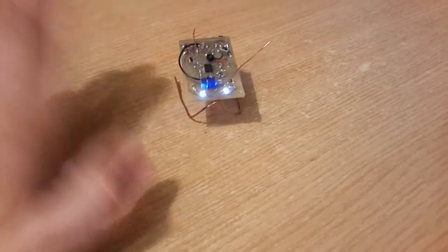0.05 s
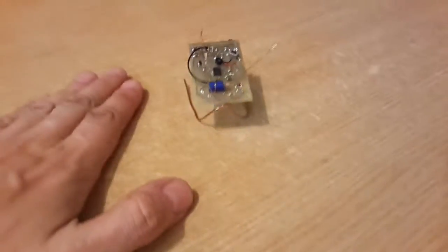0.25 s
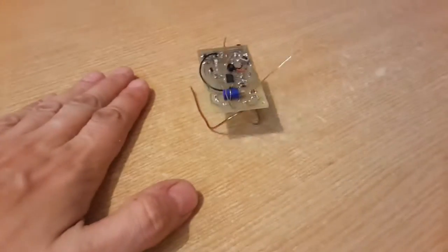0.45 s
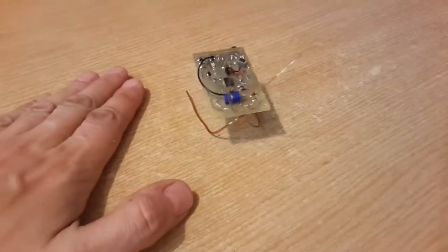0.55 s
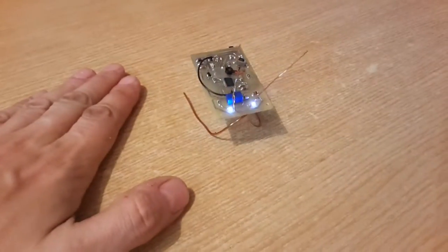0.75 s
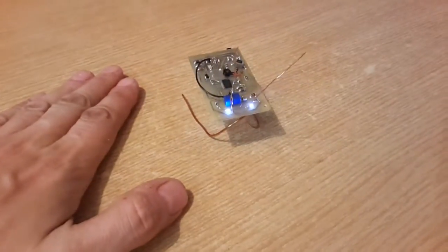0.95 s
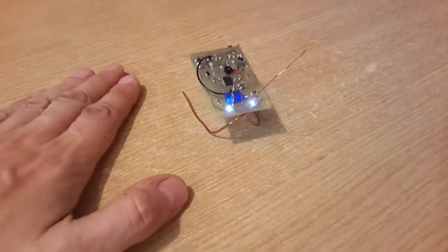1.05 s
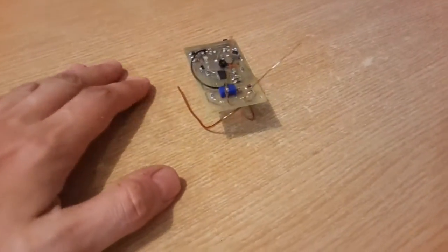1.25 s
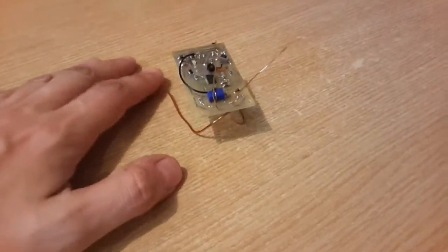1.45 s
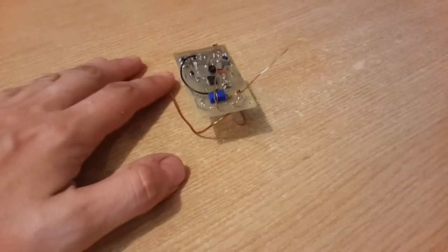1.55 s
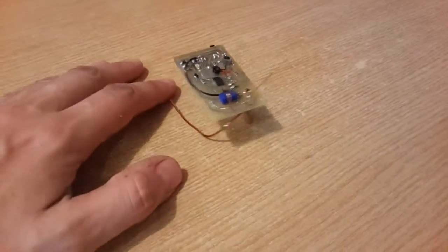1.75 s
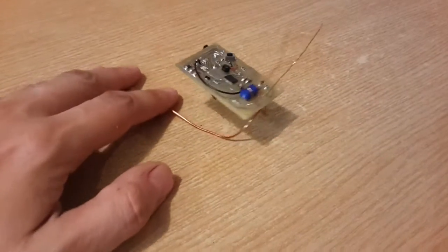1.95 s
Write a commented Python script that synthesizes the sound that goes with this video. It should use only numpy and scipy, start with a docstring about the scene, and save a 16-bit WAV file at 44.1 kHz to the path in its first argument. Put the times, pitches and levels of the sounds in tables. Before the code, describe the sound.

One sharp palm slap booms through a wooden tabletop, close to the microphone in a quiet room. A small motor follows with a brief, softer buzz and rattle of wire feet, fading into very faint tinkles and finger rubs.

```python
"""A quiet room, a stereo microphone pair close to a wooden table.
A flat hand slaps the top, which booms and rings, and wakes a tiny robot standing on wire legs.
Its vibration motor buzzes for half a second: two feet tap in each turn and clatter in fits as it hops.
The buzz fades, the robot lands, its wires tinkle faintly and fingers slide on the wood."""
import sys
import numpy as np
from scipy import signal
from scipy.fft import rfft, irfft
from scipy.io import wavfile
from scipy.ndimage import uniform_filter1d

SR = 44100
rng = np.random.default_rng(int(sys.argv[2]) if len(sys.argv) > 2 else 0)


def dump(signal):
    """Clip the signal to [-1, 1] and save it as 16-bit WAV at the path in sys.argv[1]."""
    limited = np.clip(np.atleast_2d(signal).T, -1, 1)
    pcm = np.round(limited * 32767).astype(np.int16)
    wavfile.write(sys.argv[1], SR, pcm)


N = 88200
T = np.arange(N) / SR
SLAP_S = 0.2432


# crack of skin on wood, close up (frequency [Hz], level [dB])
SKIN_CRACK = [(300, -14), (1000, 2), (1700, 4.5), (2200, 5.5), (3100, 0.5), (3600, -2.5), (4400, 7.5),
              (5400, -9), (7200, 5.5), (9000, -17.5), (16000, -13.5)]
# the slap across the microphones (frequency [Hz], left minus right [dB])
SLAP_BALANCE = [(700, 0.5), (2400, -8), (4400, 5.5), (8000, 21.5), (15000, 19.5)]
def slap(push_s=0.001194, rebound_s=0.00083, crack_s=0.0023, right_mic_lag_s=0.0002):
    """The palm pushes the board down, the skin cracks and the board springs back."""
    push = amp(-16) * arch(SLAP_S, push_s)
    rebound = amp(-9) * arch(SLAP_S + push_s, rebound_s)
    burst = rng.standard_normal(N) * np.sqrt(abs(arch(SLAP_S, crack_s)))
    direct = rebound - push + amp(-20.5) * colour(burst, SKIN_CRACK)
    mics = np.vstack([direct, delay(direct, right_mic_lag_s)])
    return room(pan(mics, SLAP_BALANCE), wet_db=-9.5)


# modes of the top (frequency [Hz], level [dB], t60 [s])
TABLE_MODES = [(71.27, -17.5, 0.7), (107.6, -5.5, 0.31), (127.1, 1.5, 0.59), (164.5, -0.5, 0.44),
               (195.2, -3.5, .45), (226.9, -2, 0.519), (261.8, -5, .4), (302.8, 1, 0.47), (344, -6.5, 0.35),
               (380, -5.5, 0.16), (423.7, -6, 0.3), (499.2, -11, 0.23), (596, 0.5, 0.34), (691, -10.5, 0.2),
               (1041, -16.5, .3)]
# dense boom of the table and the room around it (frequency [Hz], level [dB])
BOOM_SPECTRUM = [(30, -30.5), (80, -12.5), (140, -2.5), (300, -0.5), (620, 2), (780, -14), (1200, -12.5),
                 (1550, -24), (2200, -13.5), (4000, -24.5), (8000, -28), (16000, -46.5)]
# its decay (frequency [Hz], t60 [s])
BOOM_DECAY = [(80, .55), (500, 0.46), (1500, 0.28), (8000, 0.6)]
# the boom across the microphones (frequency [Hz], left minus right [dB])
BOOM_BALANCE = [(100, -3.5), (700, -1), (1300, -5.5), (2400, -7.5), (4400, 3.5), (8000, 9)]
# the slap, then the robot's landing (time [s], boom gain [dB], mode gain [dB])
TABLE_BLOWS = [(0.2442, 0.5, 0.5), (0.8143, -37, -58)]
def table(rise_s=0.021):
    """The struck top rings in low modes over a dense boom; the light robot makes only a dull thud."""
    modes = sum((-1) ** k * amp(db) * ring(hz, t60) for k, (hz, db, t60) in enumerate(TABLE_MODES))
    modes = amp(-25) * modes * (1 - np.exp(-T / rise_s))
    boom = amp(-29.5) * pan(colour(tail(BOOM_DECAY, hold_s=0.063), BOOM_SPECTRUM), BOOM_BALANCE)
    return sum(delay(amp(boom_db) * boom + amp(mode_db) * modes, s)
               for s, boom_db, mode_db in TABLE_BLOWS)


# spin of the weight (time [s], speed [turns/s])
MOTOR_SPEED = [(.3, 249), (.46, 236), (.556, 230.5), (.752, 227.6), (.82, 226), (1.0, 270)]
# strength of the buzz (time [s], hum level [dB], tapping level [dB])
MOTOR_LEVELS = [(.27, -70, -42.5), (.3, -70, -54.5), (.37, -62.5, -44), (.5, -50.5, -43), (.525, -52, -42),
                (.57, -48.5, -40.5), (.595, -52, -44.5), (.645, -51.5, -48), (.675, -52, -42.5),
                (.74, -54, -47), (.785, -49.5, -43), (.815, -60.5, -47.5), (.86, -74, -58),
                (.92, -100, -64.5), (1.02, -115, -85)]
# the robot across the microphones (frequency [Hz], left minus right [dB])
ROBOT_BALANCE = [(700, -3), (1500, -4.5), (3000, -4), (4000, 3), (5500, 5), (8000, 10.5), (10000, 4.5),
                 (14000, 14)]
def motor(waver=0.005):
    """From the slap on, an off-centre weight spins, shaking the table and rocking the feet."""
    turns = np.cumsum(curve(MOTOR_SPEED) * (1 + waver * drift(samples=1000))) / SR
    hum_db, tap_db = curve(MOTOR_LEVELS), curve(MOTOR_LEVELS, column=2)
    taps = room(foot_taps(turns) * amp(tap_db), wet_db=-9.5)
    drone = room(hum(turns, tap_db) * amp(hum_db), wet_db=-16)
    return (drone + pan(taps, ROBOT_BALANCE)) * (T > SLAP_S)


# ring of the legs and board (frequency [Hz], level [dB])
LEG_SPECTRUM = [(550, -26), (800, -12.5), (1150, -8), (1550, -20.5), (2300, -4.5), (3000, -2), (4000, -3.5),
                (4700, -13), (6000, -9.5), (7400, -3), (9500, -14.5), (15500, -18.5)]
# the legs' main ring shifts as they flex (time [s], frequency [Hz])
LEG_FLEX = [(.38, 3530), (.48, 3920), (.58, 3720), (.7, 3500), (.78, 3750)]
def foot_taps(turns, jitter_s=0.00011, spread_db=0.5, second_foot_db=-9, leg_t60=0.018, grit_s=0.002):
    """Two feet tap in each turn, ringing the board and the flexing legs."""
    times = T[1:][np.diff(np.floor(2 * turns)) > 0]
    foot = np.arange(len(times)) % 2
    force_scatter, time_scatter = rng.standard_normal((N, 2))[:len(times)].T
    times = times + jitter_s * time_scatter
    sizes = amp(spread_db * force_scatter + second_foot_db * foot)
    clicks = np.zeros((2, 1, N))  # foot, microphone, sample
    clicks[foot, 0, np.clip(times * SR, 0, N - 1).astype(int)] = sizes
    foot_rings = rng.standard_normal((2, 2, N)) * decay(T, leg_t60)
    ringing = unit(signal.fftconvolve(clicks, foot_rings, axes=2).sum(0)[:, :N])
    grit = amp(-1) * unit(contacts(times, sizes, grit_s))
    board = unit(colour(ringing + grit, LEG_SPECTRUM))
    legs = resonate(contacts(times, sizes, grit_s), curve(LEG_FLEX), width_hz=720)
    return unit(board + amp(-0.5) * legs)


# hum through the top (multiple of the spin [1], level [dB], gain with tapping [dB/dB])
HUM_ORDERS = [(1, -2.5, 0), (2, -4.5, 0), (3, -13, 1.9), (4, -4.5, .6), (5, -9, .8), (10, -14, .8)]
def hum(turns, tap_db, neutral_tap_db=-44.5, flutter_db=3, wander_cycles=0.09):
    """The weight's hum: steady low orders, and overtones that swell and waver as the feet bite."""
    bite_db = np.clip(tap_db - neutral_tap_db, -10, 10)
    tone = np.zeros((1, N))
    for order, db, bite_gain in HUM_ORDERS:
        phase = order * turns + rng.random() + wander_cycles * (order > 2) * drift(samples=600)
        swell_db = bite_gain * (bite_db + flutter_db * drift(samples=700))
        tone += amp(db + swell_db) * np.sin(2 * np.pi * phase)
    return tone


# fits of clatter (time [s], gap between knocks [s], knocks [count], level [dB])
HOP_FITS = [(.3160, 0.001, 2, -5), (0.3462, 0.0024, 3, 0), (0.3801, .0028, 2, 2.5),
            (0.4054, 0.0029, 3, -1.5), (0.4342, 0.0037, 2, -0.5), (0.4632, 0.0036, 3, -3.5),
            (.4880, 0.0037, 4, 0.5), (0.5353, 0.0049, 2, -9.5), (0.5661, 0.0034, 3, -3.5),
            (0.6611, .0043, 7, -7.5), (.7700, .0044, 4, -8)]
# wire knocking on wood (frequency [Hz], level [dB])
KNOCK_SPECTRUM = [(500, -15), (1700, -8), (3000, -2.5), (3900, 2.5), (5000, -8.5), (7300, 1.5), (8500, -7),
                  (10000, -10.5), (11300, -3), (12200, -7.5), (12900, -1.5), (15000, -10.5)]
def clatter(gain_db=-14, fade_db=1):
    """In each hop a leg knocks a few times; the second knock is the hardest."""
    times, sizes = [], []
    for start, gap, count, db in HOP_FITS:
        knock = np.arange(round(count))
        times.extend(start + knock * gap)
        sizes.extend(amp(gain_db + db - fade_db * abs(knock - 1)))
    knocks = colour(contacts(times, sizes, ring_s=0.0013), KNOCK_SPECTRUM)
    return pan(room(knocks, wet_db=-3.5), ROBOT_BALANCE)


# the feet touch down (time [s], level [dB])
TOUCHDOWNS = [(0.813, -21.5), (0.8217, -20)]
# their colour (frequency [Hz], level [dB])
LANDING_SPECTRUM = [(100, 0), (500, 0.5), (800, 0.5), (1200, 9), (1800, -1.5), (2700, 8), (6500, -3),
                    (15000, -26.5)]
def landing():
    """The robot drops back on its feet in two quick contacts."""
    s, db = np.transpose(TOUCHDOWNS)
    feet = colour(contacts(s, amp(db), ring_s=0.011), LANDING_SPECTRUM)
    return pan(room(feet, wet_db=-5), ROBOT_BALANCE)


# tinkles, faint even close up (time [s], frequency [Hz], level [dB], t60 [s])
WIRE_TINKLES = [(1, 5850, -65, 0.15), (1.4, 4100, -71, 0.22), (1.6, 2870, -67, 0.27),
                (1.34, 2750, -70, 0.43), (1.785, 2000, -70.5, 0.16)]
def wires(rise_s=0.0025):
    """Each shivering wire gives an unsteady narrow ring that swells and dies."""
    tinkles = np.zeros((2, N))
    for start, hz, db, t60 in WIRE_TINKLES:
        age = np.maximum(T - start, 0)
        shiver = resonate(rng.standard_normal((2, N)), hz, width_hz=170)
        tinkles += amp(db) * shiver * decay(age, t60) * (1 - np.exp(-age / rise_s))
    return pan(tinkles, ROBOT_BALANCE)


# feet skid, then fingers shift (peak time [s], spread [s], frequency [Hz], width [Hz], level [dB])
RUB_STROKES = [(.895, 0.031, 3770, 400, -60.5), (.905, 0.04, 4480, 650, -60.5),
               (.92, 0.059, 5900, 706, -65.5), (1.395, 0.038, 1250, 406, -69),
               (1.39, 0.019, 6100, 1200, -67), (1.61, .035, 3750, 600, -69.5),
               (1.825, .035, 6000, 398, -67.5)]
def rubs():
    """Feet and fingertips rub the wood: each stroke's friction swells and fades in one resonance."""
    strokes = np.zeros((2, N))
    for peak, spread, hz, width, db in RUB_STROKES:
        swell = np.exp(-0.5 * ((T - peak) / spread) ** 2)
        strokes += amp(db) * swell * resonate(diffuse(), hz, width)
    return pan(strokes, ROBOT_BALANCE)


# small ticks of the hand (time [s], level [dB])
HAND_TICKS = [(0.1954, -37.5), (.207, -46), (1.3050, -42.5)]
# their colour (frequency [Hz], level [dB])
TICK_SPECTRUM = [(500, -18), (2000, -16.5), (2800, 2), (4500, 5.5), (7000, -18.5), (15000, -24.5)]
# fingers sliding (time [s], level [dB])
SLIDE_LEVEL = [(.95, -110), (1.1, -71), (1.28, -79), (1.48, -71), (1.6, -67.5), (1.69, -77), (2.0, -75)]
# hiss of skin on wood (frequency [Hz], level [dB])
SKIN_HISS = [(200, -4.5), (900, -7), (2000, -3.5), (3000, -4), (3800, -3.5), (4800, -2.5), (6000, 0),
             (9000, -14), (15000, -16.5)]
# fingers and room tone across the microphones (frequency [Hz], left minus right [dB])
AMBIENT_BALANCE = [(200, -0.5), (1500, -4), (4000, -3), (8000, 8.5), (15000, -1)]
def fingers(grain_db=2):
    """Skin ticks and slides softly over the grain."""
    s, db = np.transpose(HAND_TICKS)
    ticks = room(colour(contacts(s, amp(db), ring_s=0.0014), TICK_SPECTRUM), wet_db=-7)
    grain = unit(uniform_filter1d(rng.standard_normal(N), size=300))
    slide = colour(diffuse(), SKIN_HISS) * amp(curve(SLIDE_LEVEL) + grain_db * grain)
    return pan(ticks + slide, AMBIENT_BALANCE)


# hush all around the microphones (frequency [Hz], level [dB])
HUSH_SPECTRUM = [(30, -14), (60, 0), (120, 1), (300, -2.5), (550, -6), (900, -12.5), (3000, -10),
                 (4500, -11.5), (6000, -9.5), (10000, -19.5), (15500, -22)]
# thin whine (frequency [Hz], level [dB])
WHINE_SPECTRUM = [(4000, -47), (7350, -12.5), (7580, -4.5), (7800, -9.5), (10000, -42)]
def room_tone():
    """The room's hush and a steady whine, mostly in the left microphone."""
    whine = colour(rng.standard_normal((2, N)), WHINE_SPECTRUM) * amp([[-70.5], [-87]])
    return amp(-76) * pan(colour(diffuse(), HUSH_SPECTRUM), AMBIENT_BALANCE) + whine


# the room's decay, heard from the table (frequency [Hz], t60 [s])
ROOM_DECAY = [(150, 0.32), (1000, 0.452), (4000, 0.24), (8000, 0.15), (15000, 0.284)]
def room(x, wet_db, build_s=0.0035):
    """Adds the reverberation of a small room."""
    echo = unit(tail(ROOM_DECAY) * np.minimum(T / build_s, 1)) / np.sqrt(N)
    return x + amp(wet_db) * signal.fftconvolve(x, echo, axes=1)[:, :N]


# likeness of left and right (frequency [Hz], coherence [0-1])
MIC_COHERENCE = [(100, 0.35), (300, 0.85), (600, 0.23), (1200, .1), (8000, 0.017)]
def diffuse():
    """Noise from all sides reaches the two microphones, most alike in the lows."""
    left, other = rfft(rng.standard_normal((2, N)))
    likeness = read(MIC_COHERENCE, np.fft.rfftfreq(N, 1 / SR))
    right = likeness * left + np.sqrt(1 - likeness ** 2) * other
    return irfft(np.array([left, right]), N)


def tail(t60s, hold_s=0):
    """Diffuse noise that holds, then dies at its own speed in each band."""
    hz, t, bands = signal.stft(diffuse(), SR, nperseg=512)
    fade = decay(np.maximum(t - hold_s, 0), read(t60s, hz)[:, None])
    return signal.istft(bands * fade, SR)[1][:, :N]


def contacts(times, sizes, ring_s):
    """Each contact is a gritty burst with time constant ring_s."""
    hits = np.zeros(N)
    samples = np.round(np.asarray(times) * SR).astype(int)
    np.add.at(hits, np.clip(samples, 0, N - 1), np.square(sizes))
    pole = np.exp(-2 / (ring_s * SR))
    energy = signal.lfilter([1 - pole], [1, -pole], hits + 1e-20)
    return np.sqrt(energy) * rng.standard_normal((2, N))


def resonate(x, hz, width_hz):
    """A steep resonance that may follow a pitch curve; rms 1."""
    carrier = np.exp(2j * np.pi * np.cumsum(hz * np.ones(N)) / SR)
    pole = np.exp(-np.pi * width_hz / SR)
    return unit((carrier * signal.lfilter([1], np.poly([pole, pole]), x / carrier)).real)


def colour(x, points):
    """Minimum-phase filter of unit energy with the given spectrum."""
    log_gain = np.log(amp(read(points, abs(np.fft.fftfreq(4096, 1 / SR)))))
    taps = np.fft.ifft(np.exp(np.conj(signal.hilbert(log_gain)))).real[:2048]
    return signal.fftconvolve(np.atleast_2d(x), taps[None] / np.linalg.norm(taps), axes=1)[:, :N]


def pan(x, points):
    """Tilts the left-right balance by frequency."""
    db = read(points, np.fft.rfftfreq(2 * N, 1 / SR))
    gains = amp(np.array([db, -db]) / 2)
    return irfft(rfft(x, 2 * N) * gains / np.sqrt(np.mean(gains ** 2, 0)))[:, :N]


def ring(hz, t60):
    """One decaying mode."""
    return np.sin(2 * np.pi * hz * T) * decay(T, t60)


def decay(t, t60):
    """Falls 60 dB every t60 seconds."""
    return np.exp(-np.log(1000) * t / t60)


def arch(start, length):
    """Half a sine."""
    return np.sin(np.pi * np.clip((T - start) / length, 0, 1))


def drift(samples):
    """Smooth random wander; rms 1."""
    return unit(uniform_filter1d(uniform_filter1d(rng.standard_normal(N), samples), samples))


def delay(x, s):
    """Starts a sound s seconds later."""
    return np.pad(x, ((0, 0), (round(s * SR), 0)))[:, :N]


def read(points, hz):
    """Reads a spectrum on a log-frequency axis."""
    f, value = np.transpose(points)
    return np.interp(np.log(hz + 1), np.log(f + 1), value)


def curve(rows, column=1):
    """Reads one column of a time table at every sample."""
    rows = np.array(rows)
    return np.interp(T, rows[:, 0], rows[:, column])


def amp(db):
    """Decibels to gain."""
    return 10 ** (np.asarray(db) / 20)


def unit(x):
    """Scales to rms 1."""
    return x / np.sqrt(np.mean(x ** 2) + 1e-20)


def scene():
    """Everything that reaches the microphone pair."""
    return slap() + table() + motor() + clatter() + landing() + wires() + rubs() + fingers() + room_tone()


def record(dry, cutoff_hz=15850):
    """The recorder's band limit."""
    lowpass = signal.firwin(301, cutoff_hz, window=("kaiser", 8), fs=SR)
    return signal.oaconvolve(dry, lowpass[None], "same")


dry = scene()
out = record(dry)
dump(out)
```